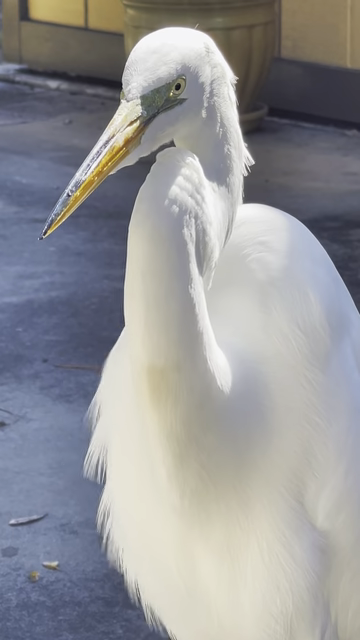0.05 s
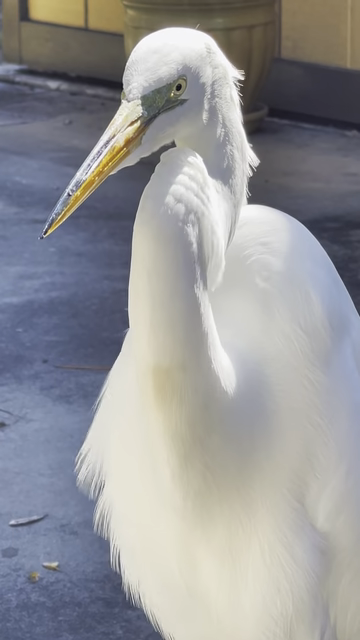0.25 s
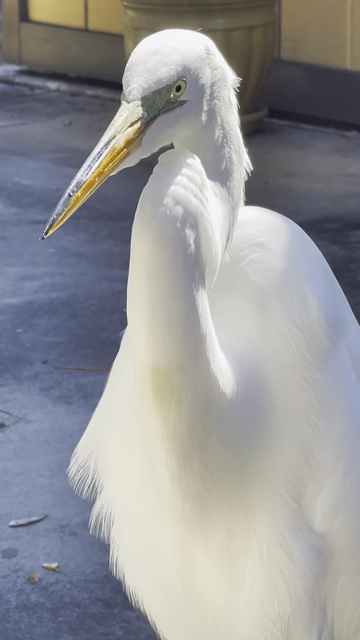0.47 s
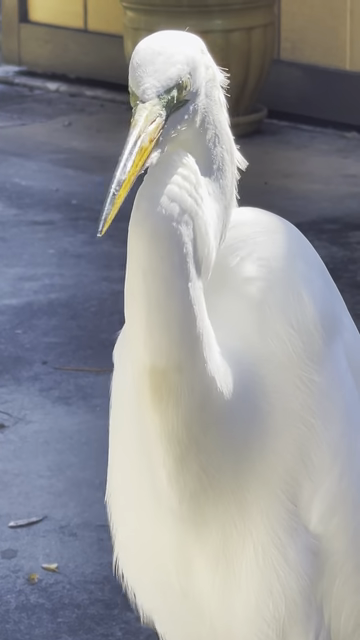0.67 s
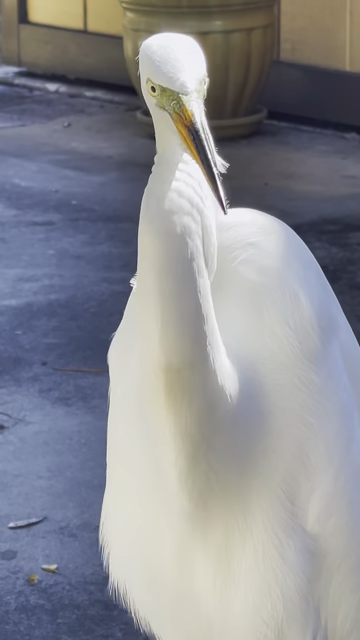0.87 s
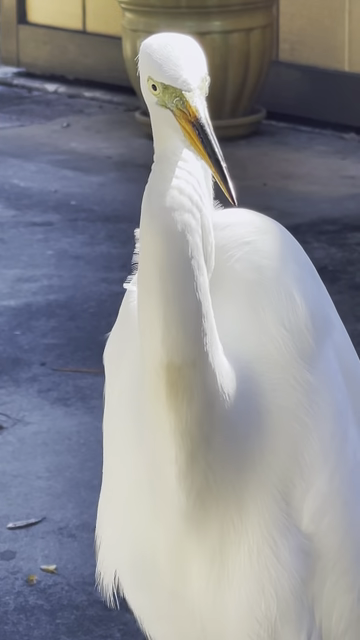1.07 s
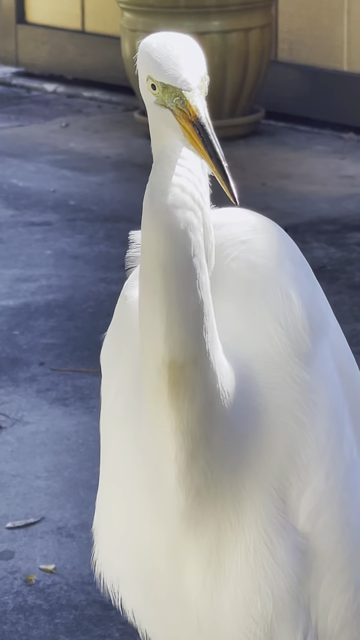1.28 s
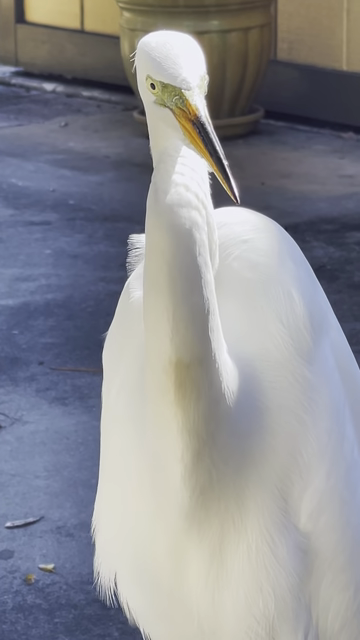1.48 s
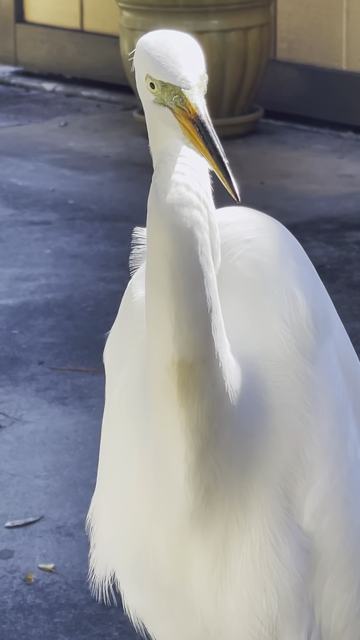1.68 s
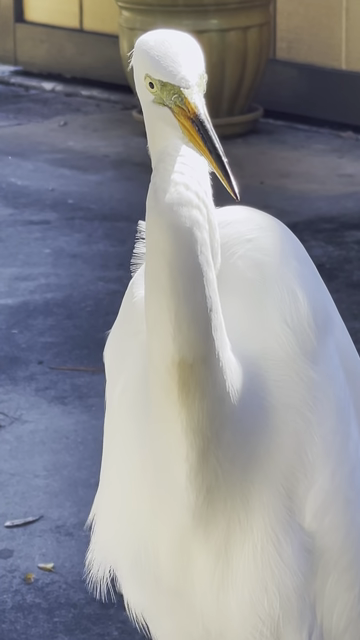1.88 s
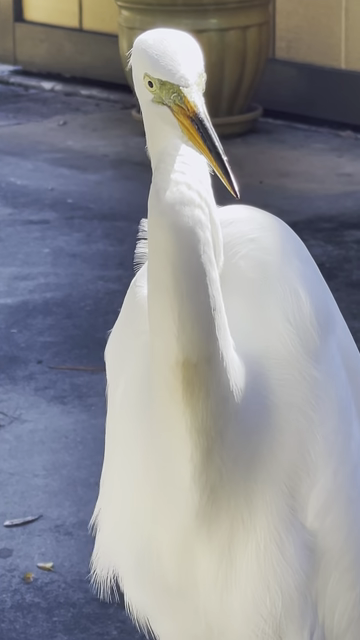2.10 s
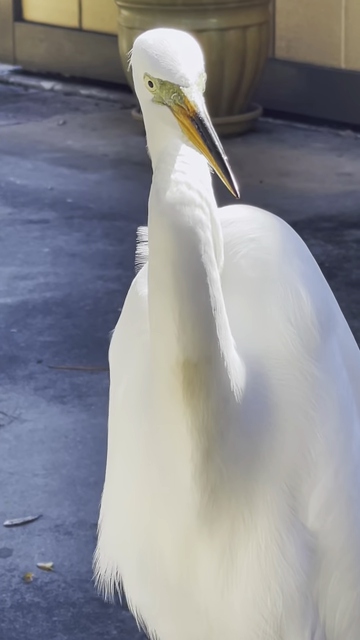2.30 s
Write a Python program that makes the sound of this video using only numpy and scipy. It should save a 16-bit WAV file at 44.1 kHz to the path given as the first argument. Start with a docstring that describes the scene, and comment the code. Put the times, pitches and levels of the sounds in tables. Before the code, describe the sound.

Light wind rumbles on the microphone outdoors while a distant bird gives three faint whistles.

```python
"""A light breeze rumbles on the microphone on a paved patio, and a few eddies thump against it.
Behind it lie an even outdoor hiss and the harmonic hum of distant motors.
A far bird gives three rising whistles, blurred by yard echoes; a few faint ticks snap close by.
A wind suppressor ducks the midrange while the rumble is strong."""
import sys
import numpy as np
from scipy import signal
from scipy.fft import rfft, irfft
from scipy.io import wavfile
from scipy.ndimage import uniform_filter1d

SR = 44100
rng = np.random.default_rng(int(sys.argv[2]) if len(sys.argv) > 2 else 0)


def pcm_store(signal):
    """Save signal as 16-bit PCM."""
    levels = np.round(np.clip(np.atleast_2d(signal), -1, 1) * 32767)
    wavfile.write(sys.argv[1], SR, levels.astype(np.int16).T)


N = 108045
TIME = np.arange(N) / SR
HZ = np.maximum(np.arange(N // 2 + 1) * SR / N, 1)


def from_db(db):
    """Decibels to gain."""
    return 10 ** (np.asarray(db) / 20)


def unit_rms(x):
    """Scale to unit rms."""
    return x / np.sqrt(np.mean(x ** 2) + 1e-20)


def envelope(rows):
    """Gain over time from (t/s, level/dB) points."""
    return from_db(np.interp(TIME, *np.transpose(rows)))


def over_log_hz(rows):
    """Interpolate (f/Hz, value) points on a log-frequency axis."""
    hz, value = np.transpose(rows)
    return np.interp(np.log(HZ), np.log(hz), value)


def noise(gain):
    """Unit-rms noise shaped by a gain per frequency."""
    return unit_rms(irfft(rfft(rng.standard_normal(N)) * gain, N))


def drift(rate_hz):
    """Unit-rms random wander, mostly below rate_hz."""
    return noise(1 / (1 + (HZ / rate_hz) ** 2))


def phase(hz):
    """Running phase in radians of a changing frequency."""
    return 2 * np.pi * np.cumsum(hz) / SR


# Background spectrum: f/Hz, relative density/dB
AIR_SPECTRUM = [(25, -31), (60, 0), (120, -2.5), (200, -2.5), (320, -9.5), (450, -15.5), (700, -19),
                (1100, -24), (2200, -26), (4200, -31), (6500, -31.5), (8500, -29), (10700, -23),
                (11400, -31), (11900, -45.5), (12500, -78)]
# Left-right coherence: f/Hz, coherence/0..1
AIR_COHERENCE = [(300, 1), (450, 0.99), (700, 0.17), (1100, 0.79), (1800, .96), (4500, 1), (10500, 1)]
# Background envelope: t/s, level/dB
AIR_LEVEL = [(0, -44), (.6, -45.5), (1.1, -44), (1.3, -45), (2.45, -46)]
def air():
    """Even outdoor background: far rumble below, smooth hiss above."""
    coherence = over_log_hz(AIR_COHERENCE)
    mid, side = rfft(rng.standard_normal((2, N)))
    stereo = np.sqrt(1 + coherence) * mid + np.sqrt(1 - coherence) * side * [[1], [-1]]
    return envelope(AIR_LEVEL) * unit_rms(irfft(stereo * from_db(over_log_hz(AIR_SPECTRUM)), N))


# Motor harmonics: multiple, loaded rms level/dB, free-running rms level/dB
MOTOR_HARMONICS = [(1, -46.5, -68), (2, -50.5, -59.5), (3, -52, -56.5), (4, -68.5, -71), (5, -71, -72)]
# Far drones: peak t/s, rms level/dB, f/Hz, half length/s
DRONES = [(2.226, -46.5, 227.4, 0.21), (2.43, -52, 186, 0.067)]
def motors():
    """A wavering hum thins and speeds up a little as its load eases; two other drones swell late."""
    loaded_hz, speed_gain, waver = 102.34, 0.01276, 0.0018
    ease_at_s, ease_s = 1.155, 0.08
    eased = .5 + .5 * np.tanh((TIME - ease_at_s) / ease_s)
    turn = phase(loaded_hz * (1 + speed_gain * eased + waver * drift(2.64)))
    hum = np.zeros(N)
    for multiple, loaded_db, free_db in MOTOR_HARMONICS:
        gain = from_db(loaded_db + (free_db - loaded_db) * eased + 2.06 * drift(7.3))
        hum += gain * np.sin(multiple * turn + rng.uniform(0, 2 * np.pi))
    for peak_s, db, hz, half_s in DRONES:
        swell = from_db(db) * np.exp(-((TIME - peak_s) / half_s) ** 2)
        hum += swell * np.sin(phase(hz * (1 + waver * drift(3.5))))
    return np.sqrt(2) * hum


def yard_echoes(x):
    """Dense reflections from the yard, dying exponentially."""
    t60_s, echo_db = 0.8, -1
    response = rng.standard_normal(N) * from_db(-60 * TIME / t60_s)
    return from_db(echo_db) * signal.fftconvolve(x, response / np.linalg.norm(response))[:N]


# Whistles: leap t/s, top-note level/dB, slur level/dB, leap time constant/s
WHISTLES = [(.297, -56, -62, 0.0053), (.702, -58.5, -60, 0.0045), (1.182, -60, -60.5, 0.0187)]
def bird():
    """Each whistle is a soft rising slur that leaps to a louder, rough top note, echoed by the yard."""
    low_hz, knee_hz, top_hz = 2306, 2984, 3406
    sweep_s, swell_s, hold_s, release_s = 0.052, 0.13, 0.029, 0.032
    slur_waver, top_waver, rough_db = 0.0207, 0.047, 2.5
    song = np.zeros(N)
    for at_s, top_db, slur_db, leap_s in WHISTLES:
        before_s = np.maximum(at_s - TIME, 0)
        after_s = np.maximum(TIME - at_s - hold_s, 0)
        on_top = .5 + .5 * np.tanh((TIME - at_s) / leap_s)
        slur_hz = low_hz + (knee_hz - low_hz) * np.exp(-before_s / sweep_s)
        waver = drift(141)
        hz = (1 - on_top) * slur_hz * (1 + slur_waver * waver)
        hz += on_top * top_hz * (1 + top_waver * waver)
        gain = from_db(slur_db + (top_db - slur_db) * on_top + rough_db * drift(150))
        song += gain * np.exp(-before_s / swell_s - after_s / release_s) * np.sin(phase(hz))
    return song + yard_echoes(song)


# Ticks: t/s, level/dB, f/Hz, tail re snap/dB, snap rise/s, tail bandwidth/ln(f)
TICKS = [(0.123, -55, 7300, -8, .0004, 0.23), (0.446, -38, 10400, -9, 0.00024, 0.13),
         (0.456, -28, 10300, -19, 0.00025, 0.22), (0.465, -41, 10300, -7, 0.00027, 0.12),
         (0.47, -37, 9800, -18, 0.00033, .15), (.9915, -44.5, 7600, -11, .0006, 0.18),
         (1.389, -50, 3160, -5.5, 0.001, 1), (1.536, -45, 7900, -12, .0003, 0.16),
         (2.288, -52, 8950, -1.5, .0003, 0.2)]
def ticks():
    """Small dry snaps ring for an instant, each with a short hissy tail."""
    tail_rise_s, tail_decay_s = 0.00066, 0.026
    out = np.zeros(N)
    for at_s, db, hz, tail_db, rise_s, log_width in TICKS:
        age_s = np.maximum(TIME - at_s, 0)
        snap = age_s / rise_s * np.exp(1 - age_s / rise_s) * np.sin(2 * np.pi * hz * age_s)
        hiss = noise(np.exp(-.5 * (np.log(HZ / hz) / log_width) ** 2))
        tail = (1 - np.exp(-age_s / tail_rise_s)) * np.exp(-age_s / tail_decay_s) * hiss
        out += from_db(db) * (snap + from_db(tail_db) * tail)
    return out


# Eddy impacts: t/s, envelope peak level/dB, initial f/Hz, rise/cycles
EDDIES = [(0.2451, -21, 109, .85), (0.557, -28, 75.5, .7), (0.579, -28.5, 60, 1), (0.663, -29.5, 94, 0.83),
          (0.82, -17, 110, 1.24), (0.8224, -21, 237, 0.85), (1.02, -28.5, 123.5, 1.05),
          (1.055, -24, 72, 0.75), (1.089, -23.5, 103, 1.03), (1.145, -22.5, 76, 1), (1.178, -26, 85, 0.83),
          (1.186, -31.5, 166, 0.87), (1.664, -36, 72.4, 0.77), (1.946, -38, 67.5, 0.98),
          (2.016, -33.5, 118, 0.94)]
def eddies():
    """Each eddy hits the microphone as a short pressure swing that slows as it dies."""
    sag_per_cycle = 0.15
    out = np.zeros(N)
    for at_s, db, hz, rise_cycles in EDDIES:
        cycles = np.maximum(TIME - at_s, 0) * hz
        age = cycles / rise_cycles
        swing = np.sin(2 * np.pi * np.log1p(sag_per_cycle * cycles) / sag_per_cycle)
        out += from_db(db) * (age * np.exp(1 - age)) ** 2 * swing
    return out


# Gust envelope: t/s, level/dB
WIND_LEVEL = [(0, -48), (.2, -49), (.3, -40.5), (.51, -50), (.57, -39), (.72, -44.5), (.81, -28),
              (.95, -38), (1.04, -37.5), (1.19, -36.5), (1.25, -49), (1.6, -57), (1.675, -39.5),
              (1.72, -49.5), (1.9, -53), (2.0, -46), (2.2, -46), (2.45, -54)]
# Rumble spectrum: f/Hz, relative density/dB
WIND_SPECTRUM = [(20, -13), (40, -1), (62, 7.5), (100, 0.5), (150, -9), (300, -26.5), (500, -38),
                 (1000, -64), (6000, -110)]
def wind():
    """Turbulent rumble common to both microphone ports, with a faint flutter that differs at each."""
    low_hz, high_hz = 535, 1100
    flutter_db, swing_db, pan_right_db = -20.5, 10.5, 4
    rumble = noise(from_db(over_log_hz(WIND_SPECTRUM)))
    rumble /= np.sqrt(uniform_filter1d(rumble ** 2, size=2600) + 1e-9)  # flatten random swells
    band = 1 / (1 + (low_hz / HZ) ** 6 + (HZ / high_hz) ** 6)
    flutter = unit_rms(noise(band) * from_db(swing_db * np.tanh(drift(24))))
    polarity = np.array([[1], [-1]])
    port_gain = polarity * from_db(flutter_db - pan_right_db * polarity)
    return envelope(WIND_LEVEL) * (rumble + port_gain * flutter)


def scene():
    """All sources at the microphone, in stereo."""
    return air() + motors() + bird() + ticks() + eddies() + wind()


def suppress_wind(x):
    """Sustained strong rumble ducks the midrange common to both channels."""
    centre_hz, log_width = 810, 0.42
    window_s, half_duck_db, depth = 0.15, -32.5, 0.97
    mid = x.mean(axis=0)
    power = np.maximum(uniform_filter1d(mid ** 2, size=int(window_s * SR)), 1e-12)
    duck = depth / (1 + (from_db(half_duck_db) ** 2 / power) ** 2)
    band = np.exp(-(np.log(HZ / centre_hz) / log_width) ** 2)
    return x - duck * irfft(rfft(mid) * band, N)


# Microphone pair phase: f/Hz, right-channel lag/rad
PAIR_LAG = [(400, 0), (1400, -.4), (2600, .7), (4100, .7), (4600, 1.6), (4900, 3.14), (5250, 5.3),
            (5750, 6.28), (6200, 6.35), (7500, 8.0), (8750, 9.33), (9400, 9.52), (10000, 10.05),
            (11000, 11.1), (11700, 12.56)]
def record(dry):
    """Microphone pair: wind suppression, a phase split growing towards the treble, two low-passes."""
    rolloff_hz, stopband_hz = 11040, 13650
    left, right = suppress_wind(dry)
    lag_rad = np.interp(HZ, *np.transpose(PAIR_LAG))
    pair = np.array([left, irfft(rfft(right) * np.exp(-1j * lag_rad), N)])
    pair = signal.sosfilt(signal.butter(8, rolloff_hz, fs=SR, output="sos"), pair)
    return signal.sosfilt(signal.cheby2(16, 60, stopband_hz, fs=SR, output="sos"), pair)


dry = scene()
out = record(dry)
pcm_store(out)
```